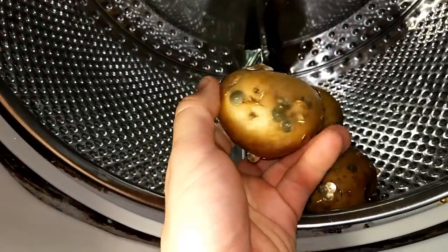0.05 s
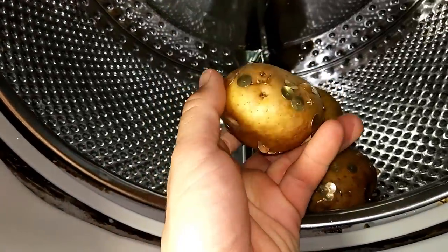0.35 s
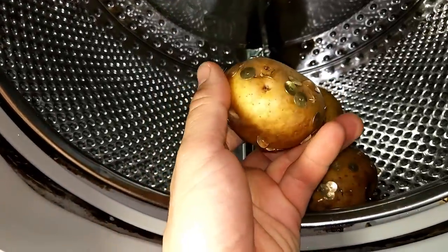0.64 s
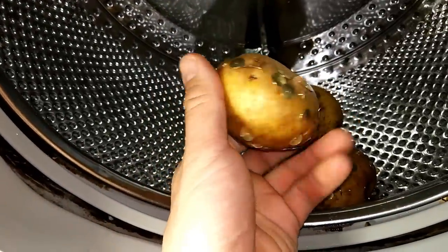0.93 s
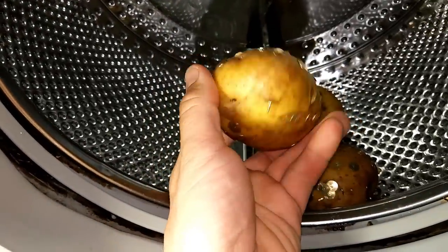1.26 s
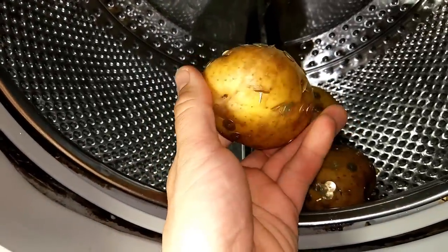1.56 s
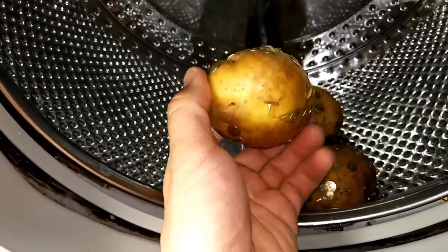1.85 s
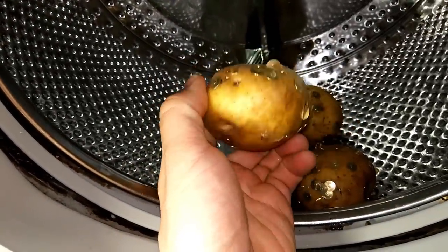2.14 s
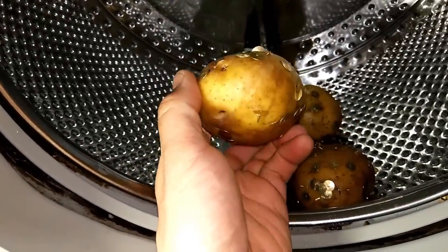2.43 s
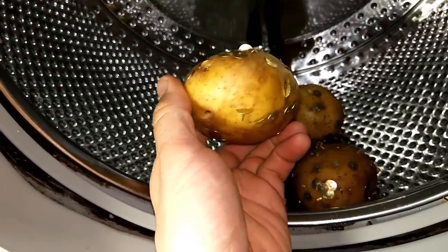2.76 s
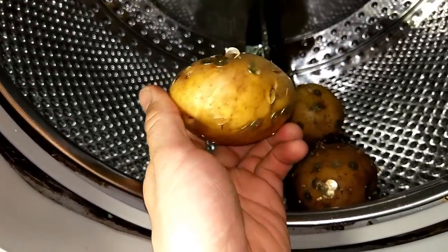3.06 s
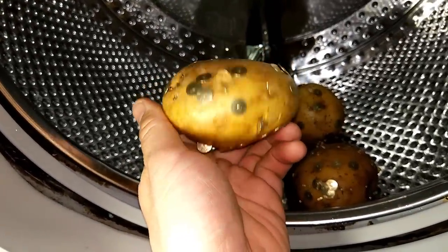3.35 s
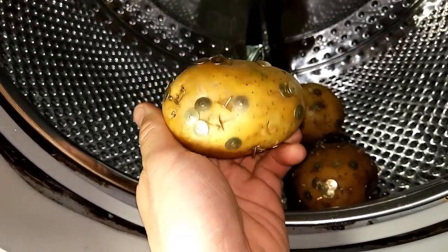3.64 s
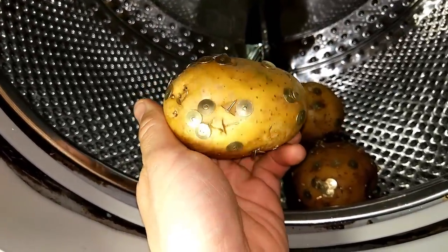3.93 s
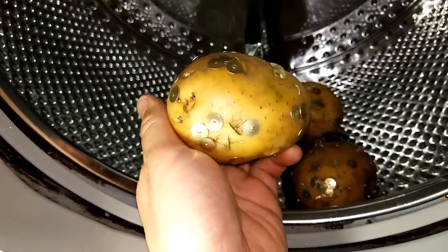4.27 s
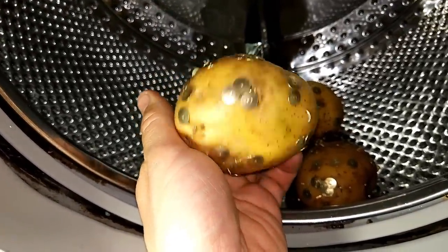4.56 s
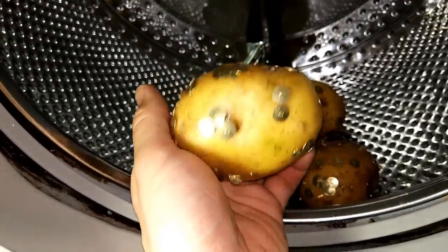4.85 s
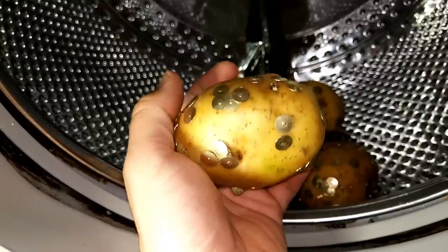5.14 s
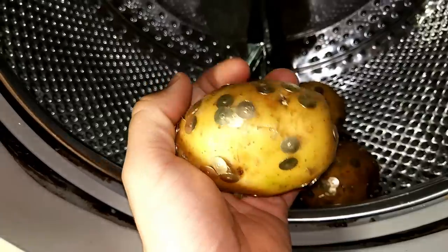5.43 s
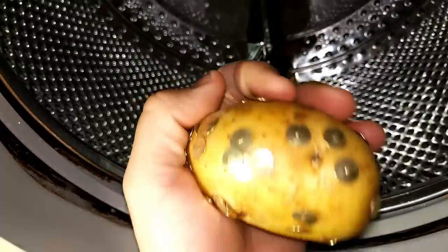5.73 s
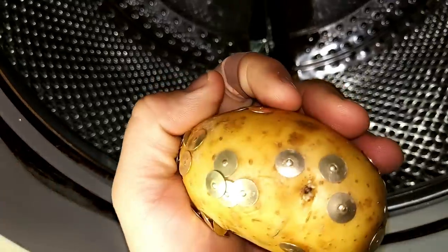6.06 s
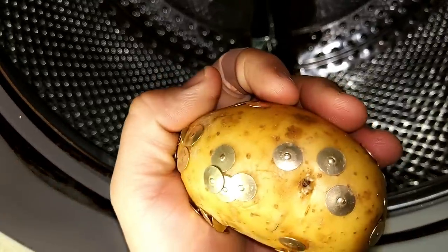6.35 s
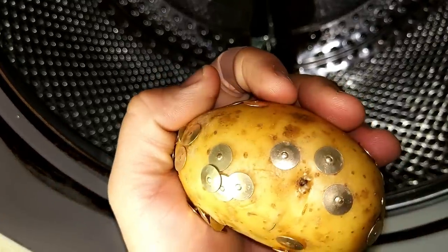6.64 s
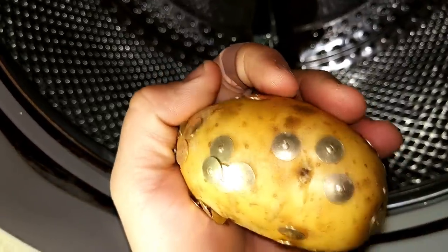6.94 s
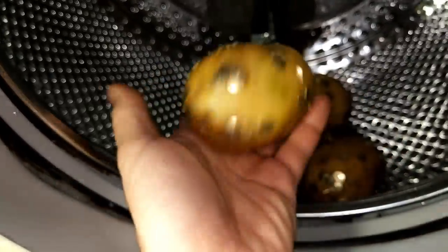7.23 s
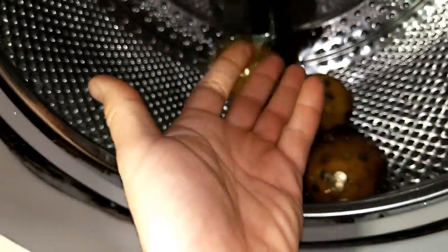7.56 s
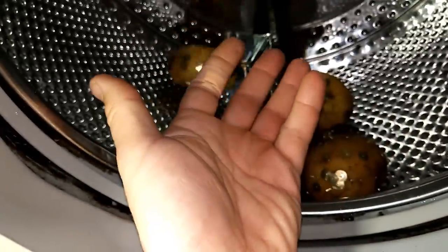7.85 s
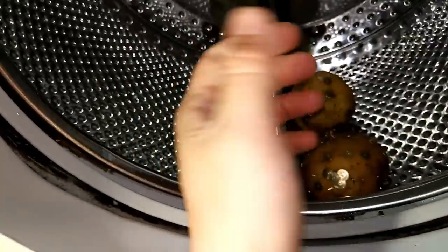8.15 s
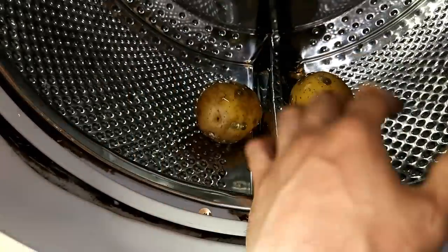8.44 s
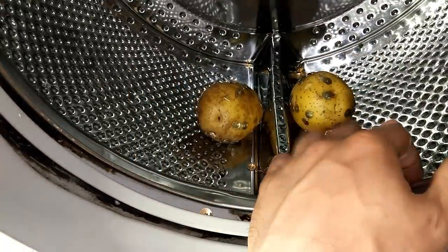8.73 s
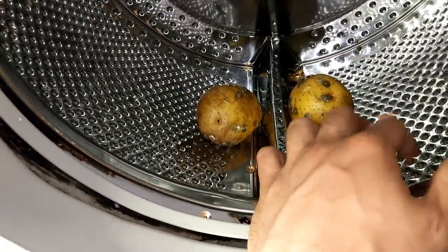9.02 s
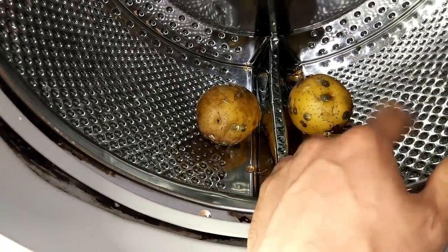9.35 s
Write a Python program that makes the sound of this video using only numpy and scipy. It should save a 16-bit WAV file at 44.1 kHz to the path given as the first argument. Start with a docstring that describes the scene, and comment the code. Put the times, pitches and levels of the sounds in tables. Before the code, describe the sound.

In a quiet room with a low, hollow murmur, fingers turn a nail-studded potato close to the microphone, making faint rubs and flicks. Two light clacks come from further off. The potato is then tossed into a steel washing machine drum, where it bounces and rolls with a loud clatter of sharp ticks, ringing clangs and low thuds. It rocks to rest, and a few soft bumps follow.

```python
"""A quiet room murmurs in the hollow of a washing machine's steel drum. A potato studded with nails is
turned in the hand with a faint friction hiss, and two clacks come from further off (4.9 s and 6.4 s).
At 7.6 s the potato is tossed in and tumbles: nail heads tick on the perforated sheet, the sheet clangs,
the shell rings in its modes and the weight of the flesh thuds the tub. It rolls between the bounces,
then rocks to rest; soft bumps follow from 8.8 s."""
import sys
import numpy as np
from scipy import signal
from scipy.fft import rfft, irfft, next_fast_len
from scipy.io import wavfile

SR = 44100
rng = np.random.default_rng(int(sys.argv[2]) if len(sys.argv) > 2 else 0)


def bounce(signal):
    """Save signal as a 16-bit WAV file at the path given by the first command-line argument."""
    frames = np.transpose(np.atleast_2d(signal))
    limited = np.clip(frames, -1, 1)
    pcm = np.round(limited * 32767).astype(np.int16)
    wavfile.write(sys.argv[1], SR, pcm)


N = 418509
TIME = np.arange(N) / SR
RING_SIZE = SR * 3 // 4
RING_TIME = TIME[:RING_SIZE]  # time since a blow

# modes of the steel shell: f/Hz, level/dB
SHELL_MODES = [(361, -13), (393, -10), (428, -11), (474, -12), (636, -11), (727, -5), (754, 0), (780, -8),
               (802, -5), (832, -6), (871, -3), (910, -3), (969, -12), (1050, -8), (1126, -10), (1198, -12),
               (1308, -12), (1360, -12), (1475, -14), (1596, -16), (1765, -9), (1857, -8), (1997, -12),
               (2089, -11), (2422, -14), (2654, -12), (3085, -16), (3165, -14)]
# spectrum of a nail head's tick, reflected round the drum: f/Hz, level/dB
TICK_SPECTRUM = [(300, -3.5), (2000, -5.5), (4500, -5), (7000, -7.5), (9000, -8.5), (11500, -5),
                 (14000, -4.5)]


def undb(db):
    """Decibels to amplitude ratio."""
    return 10 ** (np.asarray(db) / 20)


def at(points, hz):
    """Interpolate (f/Hz, value) points on a logarithmic frequency axis."""
    f, value = np.transpose(points)
    return np.interp(np.log(hz + 1), np.log(f), value)


def unit(x):
    """Normalise to rms 1."""
    return x / np.sqrt(np.mean(x ** 2))


def bins(x):
    """Frequencies of a signal's Fourier components."""
    return np.fft.rfftfreq(x.shape[-1], 1 / SR)


def tint(x, points):
    """Linear filtering: multiply the spectrum by a curve of f/Hz, gain/dB."""
    size = next_fast_len(N + SR // 10, True)
    return irfft(rfft(x, size) * undb(at(points, np.fft.rfftfreq(size, 1 / SR))), size)[:N]


def tilted(points, db_per_octave, pivot_hz):
    """Spectral tilt: tip a curve of f/Hz, level/dB about a pivot."""
    return [(hz, db + db_per_octave * np.log2(hz / pivot_hz)) for hz, db in points]


def add(out, s, sound):
    """Superposition: mix a sound in at time s."""
    start = int(s * SR)
    out[:, start:start + sound.shape[1]] += sound[:, :N - start]


def press(contact_s):
    """Forced onset: vibration builds up linearly while the contact lasts."""
    return np.minimum(RING_TIME / contact_s, 1)


def decay(t60):
    """Free decay: an exponential fall of 60 dB in t60 seconds."""
    return np.exp(-np.log(1000) * RING_TIME / t60)


def fade(x, t60_points):
    """Frequency-dependent damping: each band dies away at its own rate."""
    hz, t, frames = signal.stft(x, SR, nperseg=256)
    frames = frames * np.exp(-np.log(1000) * t / at(t60_points, hz)[:, None])
    return signal.istft(frames, SR)[1][:, :x.shape[-1]]


def flutter(depth_db, per_s):
    """Random amplitude modulation: a gain that glides through per_s levels a second."""
    return undb(depth_db * np.interp(RING_TIME, np.linspace(0, 1, per_s), rng.standard_normal(per_s)))


def field(points, size, coherent_hz, lag_s=0):
    """Diffuse noise at two microphone ports: coherence falls above coherent_hz; the left lags by lag_s."""
    noise = rng.standard_normal((3, next_fast_len(size, True)))
    hz, spectra = bins(noise), rfft(noise)
    shared = .1 + .9 / (1 + (hz / coherent_hz) ** 2)
    pair = np.sqrt(shared) * spectra[0] + np.sqrt(1 - shared) * spectra[1:]
    pair[0] *= np.exp(-2j * np.pi * hz * lag_s)
    return unit(irfft(pair * undb(at(points, hz)), noise.shape[1])[:, :size])


def ripple(x, spacing_hz, depth_db):
    """Modal overlap: crowded modes leave random spectral peaks and dips, different at each port."""
    hz = bins(x)
    knots = np.arange(0, SR / 2, spacing_hz)
    heights = rng.standard_normal((2, 1024))[:, :len(knots)]
    db = depth_db * np.array([np.interp(hz, knots[:len(row)], row) for row in heights])
    return unit(irfft(rfft(x) * undb(db * np.minimum(hz / 1500, 1)), x.shape[-1]))


def modes(table, apart_hz, detune, spread_db=1):
    """Damped normal modes: the strike point varies their strength; high ones differ in phase by port."""
    hz, db, t60 = np.transpose(table)
    strength, mistuning, phase, skew = rng.standard_normal((len(hz), 4)).T
    amplitude = undb(db + spread_db * strength)
    amplitude *= np.sqrt(2 / np.sum(amplitude ** 2))
    angle = np.outer(2 * np.pi * hz * (1 + detune * mistuning), RING_TIME).astype(np.float32)
    ports = amplitude * np.exp(1j * (np.pi * phase + np.outer([1, -1], skew * hz / apart_hz)))
    dying = decay(t60[:, None])
    return ports.real @ (np.sin(angle) * dying) + ports.imag @ (np.cos(angle) * dying)


def room_murmur(level_db=-51):
    """Cavity resonance: the drum's hollow colours a steady murmur that arrives from the right."""
    # spectrum of the room's noise: f/Hz, level/dB
    murmur_spectrum = [(25, -58), (60, -72), (100, -13.5), (140, -14), (200, 3), (300, -5), (450, -3.5),
                       (700, -7.5), (1200, -7), (1700, -13.5), (2600, -15.5), (5000, -20.5), (9000, -34.5),
                       (14000, -31)]
    # resonances of the hollow: f/Hz, width/Hz, boost/dB
    resonances = [(103.2, 6.1, 8.6), (248.6, 43.2, 15.84), (341, 16, 17.86), (477, 24.5, 8.1),
                  (1019, 45, 7.1)]
    air = field(murmur_spectrum, N, 1060, lag_s=0.00028)
    hz = bins(air)
    boost_db = sum(db / (1 + (2 * (hz - centre) / width) ** 2) for centre, width, db in resonances)
    return undb(level_db) * unit(irfft(rfft(air) * undb(boost_db), N))


def distant_clacks():
    """Reverberation: short hissy bursts far off are heard mostly by the room's decay."""
    # clacks: t/s, level/dB, rise time/s, tilt/(dB per octave)
    bursts = [(4.908, -35.5, 0.052, -0.5), (6.357, -39.5, 0.04, 1.5)]
    # their spectrum: f/Hz, level/dB
    clack_spectrum = [(400, -35), (1000, -4.5), (1600, -6.5), (2400, 1.5), (3600, -2.5), (5000, -6),
                      (7000, -11), (10000, -18), (14000, -23)]
    # reverberation time of the room: f/Hz, T60/s
    room_t60 = [(500, 0.71), (2500, 0.51), (12000, 0.41)]
    out = np.zeros((2, N))
    for s, db, rise_s, tilt in bursts:
        burst = field(tilted(clack_spectrum, tilt, 2500), RING_SIZE, 900, lag_s=0.000295)
        add(out, s, undb(db) * np.sqrt(press(rise_s)) * fade(burst, room_t60))
    return out


def slip(s, db, swell_s, fade_s):
    """Envelope of one slip: exponential growth up to time s, exponential decay after it."""
    return undb(db) * np.exp(np.minimum((TIME - s) / swell_s, (s - TIME) / fade_s))


def fingers(rub_db=-8, fidget_count=7, fidget_db=-68, held_until_s=7.5):
    """Sliding friction: each slip of the grip hisses; palm and sleeve give a duller rustle."""
    # a finger flicks off a nail head: peak t/s, level/dB
    flicks = [(.323, -44), (1.66, -49), (2.24, -48), (5.315, -49.5), (5.362, -51.5), (6.556, -55),
              (7.05, -58), (7.495, -51.5), (8.626, -56), (8.97, -54)]
    # the potato slides through the grip: peak t/s, level/dB
    slides = [(.08, -60), (.85, -60), (1.26, -54.5), (1.98, -53), (3.43, -63), (4.64, -53.5), (4.88, -53.5),
              (7.23, -53.5), (9.03, -55)]
    # spectrum of the friction: f/Hz, level/dB
    rub_spectrum = [(300, -38), (1200, 0), (3000, -4), (6500, -2), (9000, -2), (11500, 4), (14000, 3)]
    # brushes of palm and sleeve: peak t/s, level/dB, centre f/Hz
    brushes = [(.06, -55, 2520), (.23, -54, 706), (1.3, -61, 3000), (9.05, -57.5, 1000)]
    fidgets = [(s, fidget_db) for s in held_until_s * rng.random(fidget_count)]
    flick_power = sum(slip(s, db, swell_s=.0067, fade_s=.056) ** 2 for s, db in flicks)
    slide_power = sum(slip(s, db, swell_s=.058, fade_s=.065) ** 2 for s, db in slides + fidgets)
    out = undb(rub_db) * np.sqrt(flick_power + slide_power) * field(rub_spectrum, N, 900)
    for s, db, hz in brushes:
        band = [(hz / 5, -25), (hz, 0), (hz * 2, -8), (hz * 8, -35)]
        out += slip(s, db, swell_s=.04, fade_s=.08) * field(band, N, 710)
    return out


def roll_gain(rolls, t, attack_s=0.036, slowing_db_per_s=10, release_db_per_s=170):
    """Drive and decay: a roll builds up, weakens as the potato slows and rings out when it ends."""
    return sum(np.clip((t - start) / attack_s, 0, 1)
               * undb(db - slowing_db_per_s * (t - start) - release_db_per_s * np.maximum(t - end, 0))
               for start, end, db in rolls)


def rolling(tap_count=22, tap_db=-13, spread_db=4, linger_s=0.17, drone_hz=800, drone_width_hz=240):
    """Forced vibration: rolling over the dimples keeps the shell droning while single nail heads tap."""
    # rolls along the sheet, with a hop between them: start t/s, end t/s, level/dB
    rolls = [(7.762, 7.785, -29), (7.873, 8.069, -28.5)]
    out = np.zeros((2, N))
    start, end = rolls[0][0], rolls[-1][1] + linger_s
    jitter, strength = rng.random((tap_count, 2)).T
    times = start + (np.arange(tap_count) + jitter) / tap_count * (end - start)
    gains = roll_gain(rolls, times) * undb(tap_db + spread_db * (2 * strength - 1.5))
    for s, gain in zip(times, gains):
        add(out, s, gain * field(TICK_SPECTRUM, SR // 5, 1200) * decay(.1)[:SR // 5])
    # the contact is a random force that also damps the modes, widening each to 14 Hz across
    force = field([(20, 0), (20000, 0)], RING_SIZE, 1300)
    hz = bins(force)
    response = sum(undb(db) / (1 + 2j * (hz - f) / 14) for f, db in SHELL_MODES)
    response /= 1 + (2 * (hz - drone_hz) / drone_width_hz) ** 4  # favours the strongest modes
    drone = unit(irfft(rfft(force) * response, RING_SIZE))
    add(out, start, drone * roll_gain(rolls, start + RING_TIME))
    return out


def nail_tick(contact_s, t60=0.075, tail_db=-26, tail_t60=0.95):
    """Hard impact: nail heads chatter on the steel, and reflections round the drum leave a faint tail."""
    chatter = flutter(depth_db=2, per_s=1000) * decay(t60)
    envelope = np.sqrt(press(contact_s)) * (chatter + undb(tail_db) * decay(tail_t60))
    return ripple(field(TICK_SPECTRUM, RING_SIZE, 1200), spacing_hz=110, depth_db=4.5) * envelope


def sheet_clang(contact_s, tilt, early_t60=0.13, tail_db=-11):
    """Bending waves: the struck spot crashes with its own colour, then the whole drum shimmers on."""
    # dense bending modes of the perforated sheet: f/Hz, level/dB
    sheet_spectrum = [(60, -13), (150, -6), (350, 8), (600, 0), (850, 7.5), (1500, -1), (2000, 2),
                      (3000, -3.5), (4500, -7), (7000, -15.5), (14000, -24)]
    # their decay times: f/Hz, T60/s
    sheet_t60 = [(200, 2.4), (1800, 1.13), (5000, 0.77), (13000, 0.72)]
    noise = field(tilted(sheet_spectrum, tilt, 1000), RING_SIZE, 1000)
    sheet = ripple(noise, spacing_hz=60, depth_db=5.5)
    shimmer = undb(tail_db) * fade(sheet, sheet_t60)
    return np.sqrt(press(contact_s)) * (sheet * decay(early_t60) + shimmer)


def shell_ring(tilt):
    """Modal ringing: the shell's level wavers as the rolling potato loads and releases it."""
    # decay times of the shell's modes: f/Hz, T60/s
    shell_t60 = [(400, 0.8), (800, 0.67), (3000, 0.28)]
    hz, db = np.transpose(tilted(SHELL_MODES, tilt, 1000))
    ring = modes(np.c_[hz, db, at(shell_t60, hz)], apart_hz=1700, detune=.003)
    return press(0.0036) * ring * flutter(depth_db=5.5, per_s=70)


def tub_thud():
    """Soft impact: the slow push of the flesh excites low modes."""
    # modes of the tub and the air in it: f/Hz, level/dB, T60/s
    tub_modes = [(173, -5.5, 0.27), (197.2, 0, 0.34), (233.5, -4.5, 0.25), (266.3, -1.5, 0.3),
                 (295, -0.5, 0.33), (312, -8, 0.26), (393, -5, 0.087), (453, -16.5, 0.36),
                 (566, -10.5, 0.12)]
    return press(0.012) * modes(tub_modes, apart_hz=1000, detune=.0075)


def tub_sway():
    """Damped oscillation: the whole tub sways with one deep boom."""
    # swaying mode: f/Hz, level/dB, T60/s
    sway_mode = [(97, 0, .28)]
    return press(0.024) * modes(sway_mode, apart_hz=1200, detune=.004)


def strike(tick_db, clang_db, ring_db, thud_db, sway_db, contact_s, tilt):
    """Superposition of a blow's five responses; tilt, in dB per octave, brightens clang and ring."""
    return (undb(tick_db) * nail_tick(contact_s)
            + undb(clang_db) * sheet_clang(contact_s, tilt)
            + undb(ring_db) * shell_ring(tilt)
            + undb(thud_db) * tub_thud()
            + undb(sway_db) * tub_sway())


def rocking(start_s=8.149, gap_s=.062, first_db=-38, loss_db=11, nail_db=5.5, flesh_db=-10):
    """Dissipation: three evenly spaced blows of 5 ms contact dwindle as the potato settles."""
    return [(start_s + k * gap_s, first_db - k * loss_db, nail_db, flesh_db, .005) for k in range(3)]


def tumbling(sway_fall_db_per_s=18):
    """Contact hardness sets timbre: nail heads make a blow bright, flesh dull. Soft bumps follow."""
    # blows: t/s, level/dB, nail heads re level/dB, flesh re level/dB, contact time/s
    blows = [(7.621, -25.5, 3.5, 10, 0.0074), (7.685, -26, 4.5, -8, 0.0048), (7.756, -23, 0, -2, 0.002),
             (7.860, -22.5, -10.5, -23, 0.02), (7.878, -27, -0.5, -15.5, 0.01),
             (7.927, -31.5, 6, -13, 0.0022), (7.997, -30.5, -7.5, -8, 0.0056),
             (8.028, -25.5, 1.5, -13.5, .003), (8.075, -38.5, -15, -12, .008),
             (8.432, -53.5, -2, -14, 0.01), (8.728, -49.5, 5, -17.5, 0.024)]
    # soft bumps: t/s, thud level/dB, sway level/dB
    bumps = [(8.776, -34.5, -42.5), (9.388, -28.5, -66), (9.436, -41, -60)]
    out = np.zeros((2, N))
    landing_s = blows[0][0]
    for s, db, nail_db, flesh_db, contact_s in blows + rocking():
        # the tub sways most under the first high bounces
        sway_db = db - 8.5 + 0.34 * flesh_db - sway_fall_db_per_s * (s - landing_s)
        tilt = -1 + 0.31 * (nail_db - flesh_db)
        add(out, s, strike(tick_db=db + nail_db, clang_db=db, ring_db=db - 5.5, thud_db=db + flesh_db,
                           sway_db=sway_db, contact_s=contact_s, tilt=tilt))
    for s, db, sway_db in bumps:
        add(out, s, strike(tick_db=db - 24, clang_db=db - 17, ring_db=db - 18, thud_db=db,
                           sway_db=sway_db, contact_s=0.0048, tilt=0.5))
    return out


def scene(hiss_db=-65):
    """Superposition at two microphone ports: they filter every source; self-noise arises behind them."""
    # where the drum's sound falls: f/Hz, left minus right level/dB
    drum_balance = [(100, -2.5), (370, -2), (700, -2.5), (1300, 5.5), (2400, 2), (5000, 5), (12000, 4.5)]
    # response of the ports, the left resonant in the treble: f/Hz, left gain/dB, right gain/dB
    port_response = [(195, -0.5, -1.5), (420, -1.5, 0.5), (840, 1.5, 1), (2320, 2.5, 1), (4560, -1.5, 0.5),
                     (6950, 0.5, 1), (8820, 9, 4), (12070, 18, -4.5), (15200, 0, -8)]
    murmur = room_murmur()
    hiss = undb(hiss_db) * rng.standard_normal((2, N))
    left, right = tumbling() + rolling()
    hz, side_db = np.transpose(drum_balance)
    clatter = np.array([tint(left, np.c_[hz, side_db / 2]), tint(right, np.c_[hz, -side_db / 2])])
    left, right = clatter + fingers() + distant_clacks() + murmur
    hz, left_db, right_db = np.transpose(port_response)
    return hiss + np.array([tint(left, np.c_[hz, left_db]), tint(right, np.c_[hz, right_db])])


def record(dry, low_cut_hz=47, top_hz=14350):
    """Band limiting: a gentle high-pass thins the deepest bass and a steep low-pass cuts the top."""
    thinned = signal.sosfilt(signal.butter(1, low_cut_hz, "high", fs=SR, output="sos"), dry)
    return signal.sosfilt(signal.ellip(10, .2, 80, top_hz, fs=SR, output="sos"), thinned)


dry = scene()
out = record(dry)
bounce(out)
```